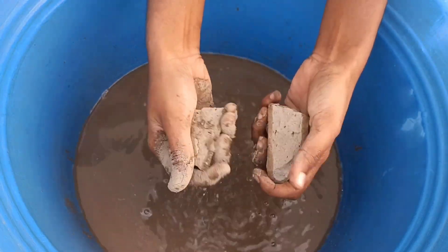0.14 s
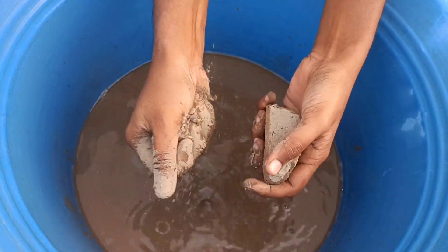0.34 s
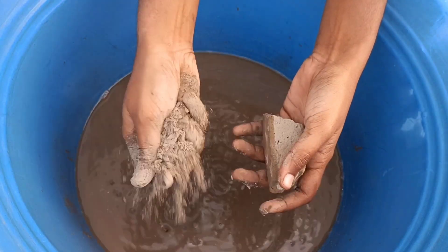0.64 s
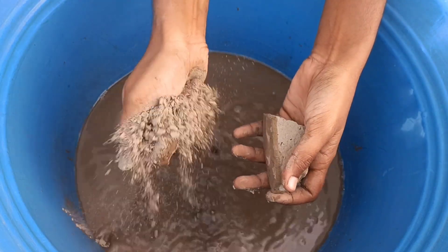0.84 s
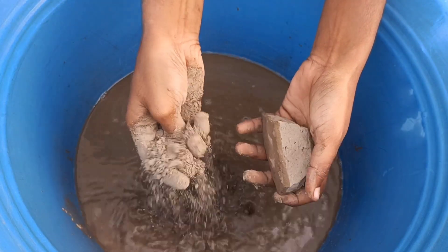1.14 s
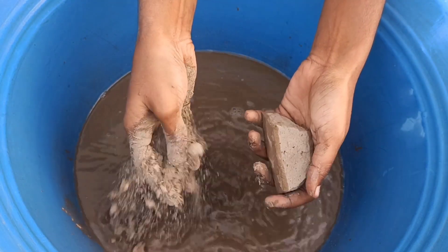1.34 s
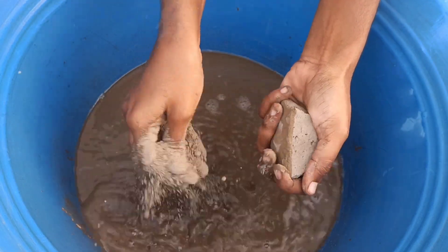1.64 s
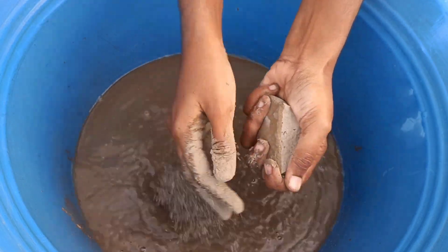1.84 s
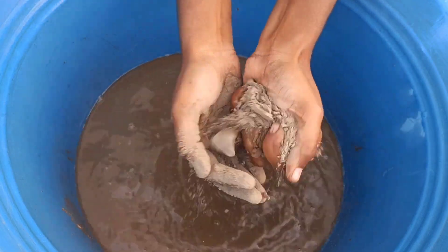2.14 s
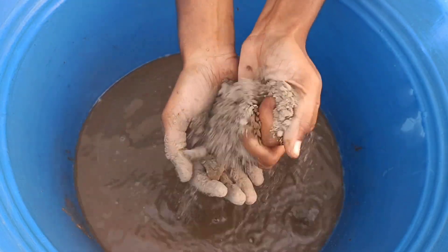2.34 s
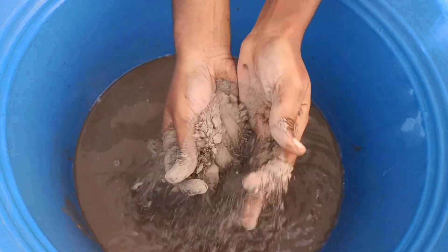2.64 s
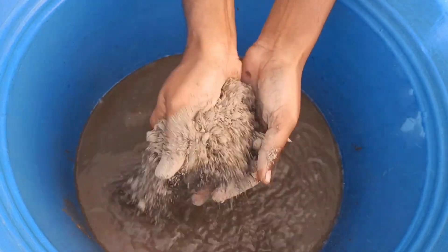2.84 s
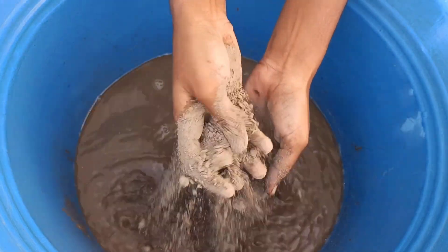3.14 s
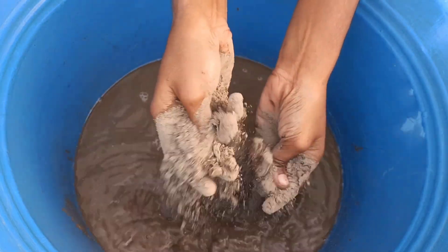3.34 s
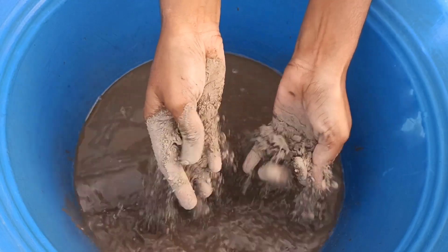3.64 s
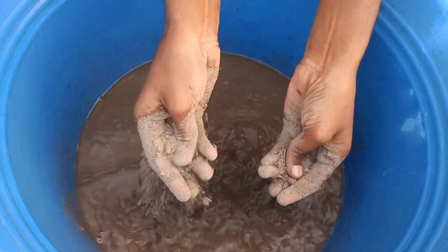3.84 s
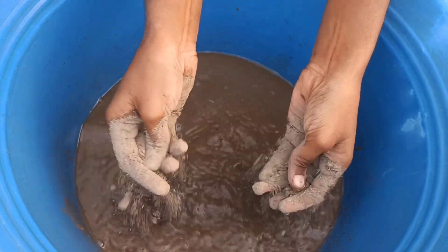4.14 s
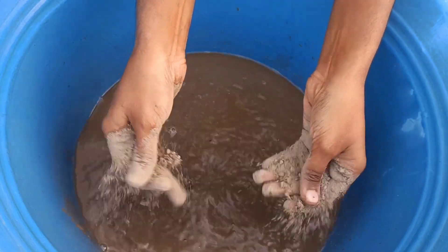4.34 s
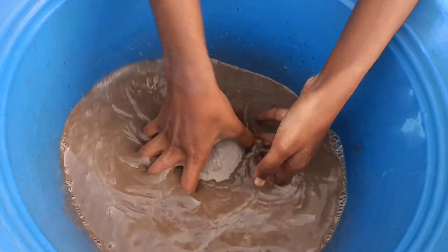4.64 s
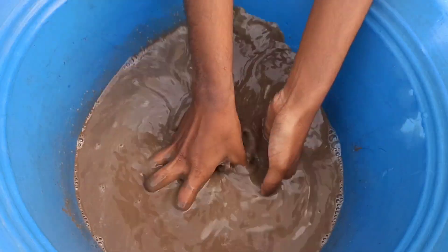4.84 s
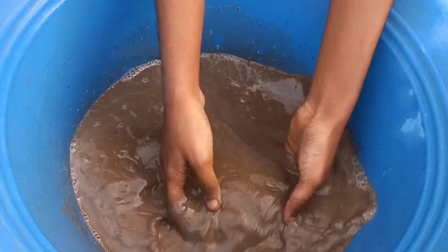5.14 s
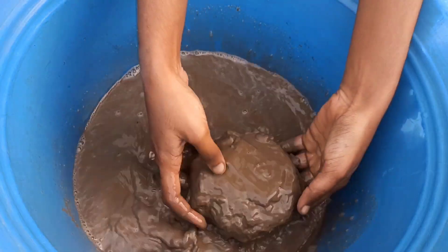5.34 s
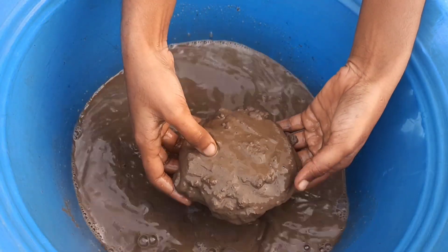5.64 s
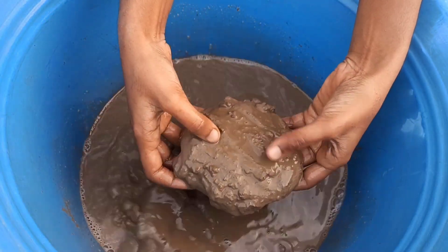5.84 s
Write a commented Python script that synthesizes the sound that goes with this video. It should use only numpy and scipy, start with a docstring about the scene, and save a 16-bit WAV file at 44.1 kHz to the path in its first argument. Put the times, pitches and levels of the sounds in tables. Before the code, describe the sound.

Close, wet plinks and bursts of gritty splashes as dirt falls into water, then hands churn bubbles and lift out a dripping lump.

```python
"""By a plastic tub of muddy water, hands crumble lumps of sandy dirt, then plunge in and lift out a soaked lump.
Each crumb is a tick of noise and the ringing of the small air pocket it opens in the water.
Clods plop as gliding tones, sand patters as swarms of tiny pockets, clumps splash as noise, and bubbles fizz.
The hands churn up a cloud of bubbles and drips run off the lump; the tub wall echoes these water sounds.
The rocking water rumbles, faint narrow tones linger, and far away a horn buzzes through its partials."""
import sys
import numpy as np
from scipy import signal
from scipy.fft import rfft, irfft
from scipy.io import wavfile
from scipy.ndimage import uniform_filter1d, minimum_filter1d

SR = 44100
rng = np.random.default_rng(int(sys.argv[2]) if len(sys.argv) > 2 else 0)


def int16_out(signal):
    """Quantize to a 16-bit WAV file."""
    q = np.round(np.clip(np.atleast_2d(signal).T, -1, 1) * 32767)
    wavfile.write(sys.argv[1], SR, q.astype(np.int16))


N = 264159
TIME = np.arange(N) / SR  # s


# "t60" below is always the time a sound takes to fade by 60 dB.
def undb(db):
    """Turn decibels into a gain."""
    return 10 ** (np.asarray(db) / 20)


def unit(x):
    """Scale a sound to an average (rms) strength of 1."""
    return x / np.sqrt(np.mean(x ** 2) + 1e-18)


def add(out, s, sound):
    """Mix a sound in, starting at s seconds."""
    i = int(np.clip(s * SR, 0, N - 1))
    out[i:i + len(sound)] += sound[:N - i]


def colour(x, points):
    """Shape the spectrum to (Hz, dB) points with a filter that never rings ahead of the sound."""
    size = 4096
    hz, db = np.transpose(points)
    bin_hz = np.arange(size // 2 + 1) * SR / size
    gain = undb(np.interp(np.log(bin_hz + 1), np.log(hz), db))
    # folding the cepstrum (the transform of the log gain) makes the filter minimum phase
    cepstrum = irfft(np.log(gain))
    cepstrum[1:size // 2] *= 2
    cepstrum[size // 2 + 1:] = 0
    response = irfft(np.exp(rfft(cepstrum)))
    return signal.fftconvolve(x, response)[:len(x)]


def fade(t, t60):
    """Die away exponentially, 60 dB down after t60."""
    return np.exp(-np.log(1000) * t / t60)


def surge(s, hold, rise, fall, db):
    """Gain over time of something that builds up, holds and dies away."""
    early = np.maximum(s - TIME, 0)
    late = np.maximum(TIME - s - hold, 0)
    return undb(db) * fade(early, rise) * fade(late, fall)


def together(gains):
    """Unrelated sounds add in power, not in amplitude."""
    return np.sqrt(sum(g ** 2 for g in gains))


def flicker(rate, depth_db):
    """A gain that heads for a new random level, rate times a second."""
    steps = rng.standard_normal(1000)
    return undb(depth_db * np.interp(TIME * rate, np.arange(len(steps)), steps))


def by_pitch(hz, seconds, slope):
    """Small, high pockets are quicker: a time given at 1 kHz, scaled by a power law."""
    return seconds * (hz / 1000) ** slope


def pocket(hz, t60, swell, glide):
    """An air pocket swells open, then its ring dies away; its pitch glides by so many octaves per t60."""
    t = np.arange(int((swell + t60) * SR) + 2) / SR
    phase = 2 * np.pi * np.cumsum(hz * 2 ** (glide * t / t60)) / SR
    opening = np.sin(np.pi / 2 * np.minimum(t / swell, 1))
    return np.sin(phase) * opening * fade(np.maximum(t - swell, 0), t60)


def swarm(rate, low_hz, high_hz, cycles, spread_db, glide, swell_cycles):
    """Many small pockets, rate per second at random moments, most weak and a few strong."""
    out = np.zeros(N)
    for when, pitch, size, ring, bend in rng.random((int(rate * N / SR), 5)):
        hz = min(low_hz * (high_hz / low_hz) ** pitch, SR / 3)
        strength = undb(-spread_db * np.log(size + 0.004)) * np.sqrt(hz)
        t60 = cycles * (.5 + ring) / hz
        add(out, when * N / SR, strength * pocket(hz, t60, swell_cycles / hz, glide * 2 * bend))
    return unit(out)


# Sound of the pattering grains, of the fine grit and of the spray, as relative spectra: f/Hz, level/dB
PATTER_SPECTRUM = [(250, -16), (420, -5), (650, -3.5), (850, -12), (1200, 2.5), (2000, -1), (3000, 0),
                   (4200, -5.5), (5200, -23), (8000, -31)]
GRIT_SPECTRUM = [(3500, -39), (5100, -9.5), (6500, 6), (7700, -12), (9000, 2.5), (10000, -23.5),
                 (16000, -27)]
SPRAY_SPECTRUM = [(6000, -29.5), (9500, 2.5), (11500, -2.5), (14000, 6), (16000, -6.5)]
# Falls of sand or water, also used by fizz() and heave(); levels are before each layer's own trim.
# t/s, hold/s, rise/s and fall/s (both for 60 dB), then
# patter level/dB, fine grit level/dB, spray level/dB, fizz level/dB, rocking level/dB
SAND_FALLS = [(0.0, 0.0059, .1, 0.1, -78, -53.5, -85, -75, -35.5),
              (0.58, 0.047, 0.12, 1.2, -73, -65, -90, -73.5, -43.5),
              (0.93, .04, 0.35, 0.23, -69.5, -77, -92, -65.5, -64),
              (1.087, 0.087, 0.11, 0.42, -63.5, -68, -80, -61, -49.5),
              (1.34, 0.05, 0.32, 0.23, -41, -51.5, -67, -52.5, -35.5),
              (1.626, 0.16, 0.31, 0.15, -42.5, -58.5, -61, -62, -45),
              (1.862, 0.026, 0.59, 1.2, -52, -73, -87, -60, -52.5),
              (2.152, .12, 0.21, 0.22, -54.5, -69.5, -88, -74, -50),
              (2.936, .09, 0.07, 0.39, -52, -62.5, -60.5, -54.5, -39),
              (3.409, .02, 0.14, 0.22, -51, -57.5, -80, -51.5, -44),
              (3.693, .19, 0.54, 0.88, -32, -48, -53.5, -54.5, -39),
              (4.05, .03, 0.31, 0.28, -39, -63, -76, -57, -43),
              (4.466, 0.014, 0.55, 1, -52, -63.5, -78, -70, -30.5),
              (4.799, .02, 0.18, .6, -48, -69.5, -84, -75, -53.5),
              (4.953, 0.011, 0.18, 0.71, -28.5, -59, -71.5, -45, -24),
              (5.439, .05, 0.34, 0.36, -25.5, -46, -59.5, -33, -29),
              (5.65, .05, 0.4, 1.1, -53, -67, -68.5, -57.5, -52),
              (5.856, 0.16, 0.35, .5, -55, -52, -67, -48.5, -46)]


def sand(shower_db=-44, small_crumbs_db=-3):
    """Single grains plink on the water and merge into a wash as more fall; fine grit and spray hiss above them."""
    flow = together(surge(s, hold, rise, fall, db) for s, hold, rise, fall, db, *_ in SAND_FALLS)
    flow = flow * flicker(rate=60, depth_db=2)
    dust = together(surge(s, hold, rise, fall, db) for s, hold, rise, fall, _, db, *_ in SAND_FALLS)
    spray = together(surge(s, hold, rise, fall, db) for s, hold, rise, fall, _, _, db, *_ in SAND_FALLS)

    single = swarm(rate=81, low_hz=1660, high_hz=4800, cycles=23, spread_db=9.0, glide=.1, swell_cycles=3.8)
    shower = swarm(rate=1600, low_hz=413, high_hz=4800, cycles=29, spread_db=2.5, glide=.1, swell_cycles=1.0)
    small_crumbs = swarm(rate=64, low_hz=1350, high_hz=3250, cycles=38, spread_db=5.5, glide=.05,
                         swell_cycles=1.1)
    single = unit(colour(single + rng.standard_normal(N), PATTER_SPECTRUM))
    shower = unit(colour(shower + undb(-10) * rng.standard_normal(N), PATTER_SPECTRUM))
    merged = flow / (flow + undb(shower_db))  # 0: single grains, 1: all wash
    grains = np.sqrt(1 - merged) * single + np.sqrt(merged) * shower
    patter = flow * (grains + undb(small_crumbs_db) * small_crumbs)

    grit = swarm(rate=500, low_hz=4180, high_hz=14600, cycles=4.9, spread_db=1.5, glide=0, swell_cycles=1.0)
    grit = grit + undb(-1) * rng.standard_normal(N)
    fine = dust * unit(colour(grit, GRIT_SPECTRUM)) + spray * unit(colour(grit, SPRAY_SPECTRUM))
    fine = fine * flicker(rate=57, depth_db=4.5)
    return undb(-2.0) * patter + undb(-2.0) * fine


# Clumps of sand slapping the water and bursting into spray:
# t/s, level/dB (before fading), t60/s, treble tilt/(dB per octave)
SAND_SPLATS = [(0.0, -41.5, 0.08, -5), (0.565, -48.5, 0.15, -3), (1.327, -27, 0.043, -0.5),
               (1.347, -43.5, 0.11, -1.5), (1.364, -20.5, 0.026, 2), (1.399, -40.5, 0.15, -1),
               (1.431, -35.5, 0.11, -2), (1.645, -23.5, 0.032, -3), (1.657, -19.5, 0.068, -3.5),
               (1.696, -12, 0.036, -2.5), (1.7075, -13.5, 0.019, 2.5), (1.744, -7, 0.015, -3.5),
               (2.137, -38.5, 0.15, -2), (2.953, -35, 0.049, -0.5), (3.002, -52, 0.11, 14),
               (3.033, -44.5, 0.078, 1.5), (3.772, -24.5, 0.077, -2), (3.871, -24, 0.032, 0.5),
               (4.471, -53, 0.19, -2), (4.581, -44, 0.5, -8.5), (4.815, -53.5, 0.095, 13),
               (4.965, -38, 0.11, 5), (5.466, -22.5, 0.043, -4)]


def splats(grain_db=3):
    """Many grains land at once: a ragged burst of noise over a wide range that dies quickly."""
    out = np.zeros(N)
    t = np.arange(SR // 4) / SR
    band_hz = np.array([120, 300, 600, 2000, 4200, 5200, 6600, 9000, 11000, 15000])
    band_db = np.array([-14.5, -5.5, 6, 8.5, 3, -8.0, 1, -3.0, -10.5, -13.0])
    for s, db, t60, tilt_db in SAND_SPLATS:
        noise, clumps = rng.standard_normal((2, len(t)))
        grains = noise * undb(grain_db * unit(uniform_filter1d(clumps, size=40)))
        tilted_db = band_db + tilt_db * np.log2(band_hz / 2000)
        burst = colour(grains, np.column_stack([band_hz, tilted_db]))
        add(out, s, undb(db) * unit(burst) * fade(t, t60))
    return out


# The fizz trails each fall
FIZZ_LAG_S, FIZZ_RISE_S, FIZZ_T60_S = 0.0061, 0.14, 0.43
# Sound of the bursting bubbles, as a relative spectrum: f/Hz, level/dB
FIZZ_SPECTRUM = [(1000, -21.5), (1800, -4), (2600, -10.5), (3500, -1), (4200, -4.5), (4700, -1.5),
                 (5300, -23.5), (9000, -37.5)]


def fizz(wash_db=-4, stirred_db=-30, stirred_share=0.91):
    """After each fall and under the hands, tiny bubbles leave the soaking grains and burst in a soft crackle."""
    tiny = swarm(rate=450, low_hz=1800, high_hz=4800, cycles=28, spread_db=4.0, glide=.1, swell_cycles=2.3)
    crackle = unit(colour(tiny + undb(wash_db) * rng.standard_normal(N), FIZZ_SPECTRUM))
    soaking = [surge(s + FIZZ_LAG_S, hold, FIZZ_RISE_S, FIZZ_T60_S, db)
               for s, hold, *_, db, _ in SAND_FALLS]
    stirred = undb(stirred_db) * stirring() ** stirred_share
    return crackle * together(soaking + [stirred])


# Rocking at the usual level has this t60; it settles twice as fast for each step of ROCK_SHORTEN_DB
ROCK_RISE_S, ROCK_T60_S, ROCK_USUAL_DB, ROCK_SHORTEN_DB = 0.12, 0.96, -43.5, 17
# Sound of the rumbling wall, as a relative spectrum: f/Hz, level/dB
HEAVE_SPECTRUM = [(20, -20), (45, -7), (90, 1), (125, 4.5), (165, -10), (215, -2), (320, -2), (420, -18),
                  (800, -29.5), (2000, -43.5)]


def heave(stirred_db=-24, idle_db=-59):
    """Each fall and stroke rocks the water, which makes the plastic wall rumble; big falls settle fastest."""
    rocking = []
    for s, hold, *_, db in SAND_FALLS:
        t60 = ROCK_T60_S / 2 ** ((db - ROCK_USUAL_DB) / ROCK_SHORTEN_DB)
        rocking.append(surge(s, hold, ROCK_RISE_S, t60, db))
    level = together(rocking + [undb(stirred_db) * stirring(), undb(idle_db)])
    rumble = unit(colour(rng.standard_normal(N), HEAVE_SPECTRUM))
    return undb(-7.0) * rumble * level


# Faint narrow tones between the splashes: t/s, length/s, f/Hz, width f/Hz, level/dB (before fading), t60/s
LINGERING_TONES = [(0.0, 0.56, 435, 6.7, -51, 0.65), (0.0, 0.29, 224, 5.2, -50, 0.77),
                   (2.143, .18, 313.4, 23, -50, 2.2), (2.203, 0.5, 2050, 164, -60.5, 0.95),
                   (2.532, 0.45, 645, 37, -68, 33.4), (2.935, .26, 628, 30, -57, 30),
                   (3.287, 0.43, 640, 22, -64, 31), (3.01, .21, 1023, 28, -54, 2.8),
                   (5.2, .22, 3880, 30, -46.5, 2.4)]


def tones():
    """Slow random noise shifted up to one pitch gives narrow wavering tones that come in softly and fade."""
    out = np.zeros(N)
    for start, length, hz, width_hz, db, t60 in LINGERING_TONES:
        narrow = signal.butter(2, width_hz, fs=SR, output="sos")
        t = np.arange(int(length * SR)) / SR
        noise = rng.standard_normal(2 * SR) + 1j * rng.standard_normal(2 * SR)
        waver = signal.sosfilt(narrow, noise)[-len(t):]
        tone = unit(np.real(waver * np.exp(2j * np.pi * hz * t)))
        add(out, start, undb(db) * tone * fade(t, t60) * signal.windows.tukey(len(t), .15))
    return out


# Sound of the quiet background, as a relative spectrum: f/Hz, level/dB
BACKGROUND_SPECTRUM = [(30, -10), (120, -0.5), (300, -14.5), (500, -19.5), (1500, -20), (4000, -30),
                       (15000, -32)]


def background():
    """Quiet steady noise, strongest in the bass."""
    return undb(-69.0) * unit(colour(rng.standard_normal(N), BACKGROUND_SPECTRUM))


# Ring time of a 1 kHz pocket, and its power law over pitch
CRUMB_T60_S, CRUMB_T60_SLOPE = 0.039, -0.67
# The loudest crumbs and drops striking the water, levels relative:
# t/s, starting f/Hz of the air pocket, ring level/dB, tick level/dB
LOUD_CRUMBS = [(0.5621, 1806, -31, -51), (0.828, 2390, -36.5, -75), (0.947, 2260, -47, -73),
               (1.112, 2370, -30, -56), (1.1685, 2180, -34, -42), (1.2438, 2250, -35.5, -66),
               (1.2748, 2270, -28, -28.5), (1.289, 3130, -26.5, -43), (1.3272, 1404, -12, -27),
               (1.3475, 1890, -21, -40), (1.364, 3000, -36, -20.5), (1.3968, 2640, -26.5, -33),
               (1.4028, 2230, -20.5, -38), (1.439, 1920, -20, -31), (1.592, 6000, -36.5, -31.5),
               (1.632, 1025, -19.5, -22), (1.6578, 1340, -12.5, -29), (1.6976, 1052, -7, -23),
               (1.7455, 1102, -8.5, -17), (1.765, 1360, -11.5, -20), (1.899, 1780, -38, -63),
               (2.019, 1750, -37.5, -70), (2.0911, 1735, -37.5, -60), (2.239, 3150, -46.5, -57),
               (2.914, 2473, -36, -58), (2.9315, 3290, -25.5, -51), (2.9502, 2380, -22, -50),
               (2.9838, 1900, -23.5, -45), (3.019, 3350, -26, -32), (3.0345, 2160, -32.5, -36),
               (3.0934, 2004, -37.5, -67.5), (3.3713, 2420, -32, -67), (3.406, 2350, -28.5, -49),
               (3.423, 1980, -35, -34), (3.5833, 1820, -29, -37), (3.631, 1347, -22, -45),
               (3.6504, 1074, -22, -27.5), (3.714, 1114, -13, -22.5), (3.7266, 1830, -16.5, -36),
               (3.7458, 1405, -14.5, -27), (3.7754, 2530, -16, -34), (3.8396, 2500, -23, -23.5),
               (3.8619, 1860, -10.5, -24), (3.8739, 1032, -15, -22), (3.9182, 1950, -16.5, -45),
               (3.948, 1480, -22.5, -31), (4.0522, 1830, -17, -34), (4.0666, 1548, -16, -27.5),
               (4.0799, 1404, -16.5, -44), (4.3573, 1860, -37.5, -68), (4.4263, 2700, -31, -62),
               (4.5813, 970, -30.5, -74), (4.5963, 1300, -28.5, -63), (4.8046, 1870, -33, -78),
               (4.9245, 2000, -18.5, -31), (4.9317, 1870, -16.5, -42), (4.9607, 1864, -12, -20.5),
               (4.9678, 1117, -5, -30), (5.121, 1420, -4.5, -30), (5.438, 2000, -16.5, -46),
               (5.4628, 900, -15, -9), (5.4688, 1895, -6.5, -35), (5.4868, 990, -8.5, -20.5),
               (5.5412, 1940, -13.5, -19.5), (5.7107, 4100, -36.5, -41), (5.831, 4000, -24.5, -51),
               (5.8541, 2680, -19, -29), (5.9082, 1430, -22.5, -17.5), (5.9178, 1880, -17.5, -25)]


def crumbs(sag=-0.028, splash_db=-6, splash_t60=0.028, tick_db=-3, tick_t60=0.011,
           slap_db=-2, body=0.82, bright=2.53, swell_cycles=0.44):
    """A hard tick and a slap at contact, the ring of the pocket, and a brief splash around its pitch."""
    rings, ticks = np.zeros(N), np.zeros(N)
    t = np.arange(SR // 12) / SR
    for s, hz, db, hit_db in LOUD_CRUMBS:
        splash_noise, tick_noise = rng.standard_normal((2, len(t)))
        band = signal.butter(1, [hz * 1.032, min(hz * 1.18, SR / 3)], "band", fs=SR, output="sos")
        plip = undb(splash_db) * unit(signal.sosfilt(band, splash_noise)) * fade(t, splash_t60)
        ring_t60 = by_pitch(hz, CRUMB_T60_S, CRUMB_T60_SLOPE)
        add(plip, 0, pocket(hz, ring_t60, swell_cycles / hz, sag))
        slap = pocket(hz * 1.3, 0.0032, .0001, -0.25)
        add(plip, 0, undb(slap_db) * slap)
        # a small pocket radiates little far from its own pitch
        reach_hz = [hz * min(body, .9), min(hz * max(bright, 1.3), SR / 3)]
        reach = signal.butter(3, reach_hz, "band", fs=SR, output="sos")
        add(rings, s - .0003, undb(db) * signal.sosfilt(reach, plip))
        onset = np.minimum(t / 0.00028, 1)
        add(ticks, s, undb(hit_db + tick_db) * tick_noise * fade(t, tick_t60) * onset)
    tick_spectrum = [(300, -11), (1500, 0.5), (4200, 13.0), (5200, -1.5), (6600, 7.5),
                     (8500, -11.5), (10500, -14.0), (15000, -17)]
    return rings + colour(ticks, tick_spectrum)


# Time a 1 kHz pocket takes to open, and its power law over pitch
SWELL_S, SWELL_SLOPE = 0.0033, -0.68
# Clods, gulps, bubbles and small high crumb plinks:
# t/s, starting f/Hz, level/dB (before roughening), t60/s, glide/(octaves per t60)
PLOPS_AND_PLINKS = [(1.552, 1138, -33.5, 0.13, -0.5), (1.633, 493, -21.5, 0.022, -0.45),
                    (1.64, 470, -17, 0.029, -.2), (1.659, 550, -22, 0.055, -0.1),
                    (1.706, 477, -12, 0.027, 0.064), (1.707, 6500, -8, .007, -.14),
                    (1.715, 377, -21, 0.15, -0.39), (1.729, 331, -23, 0.13, -0.37),
                    (1.746, 483, -23, 0.1, -0.7), (1.823, 1880, -36, 0.028, -0.3),
                    (2.137, 326, -36, 0.21, -0.073), (2.142, 660, -31, 0.079, 0.01),
                    (2.566, 4020, -53, .018, 0.077), (2.671, 1086, -39.5, 0.08, -0.21),
                    (3.125, 3920, -50, .012, .1), (3.209, 3800, -44, 0.014, 0.39),
                    (3.279, 3700, -46, 0.015, 0.29), (3.651, 1124, -16.5, .028, -0.057),
                    (3.715, 1113, -13, 0.03, -0.32), (3.774, 659, -25, .065, 0.099),
                    (3.873, 638, -23, .071, -0.089), (3.876, 412, -23, 0.028, -0.58),
                    (4.193, 2250, -37, 0.03, 0.15), (4.233, 1072, -40, 0.068, -0.14),
                    (4.406, 338, -33.5, 0.22, 0.14), (4.470, 1080, -10.5, 0.031, -0.38),
                    (4.473, 501, -22.5, 0.083, -.7), (4.950, 690, 1, 0.0069, -.1),
                    (4.969, 493, -14.5, 0.081, -0.85), (4.978, 356, -2.5, 0.036, -0.24),
                    (4.992, 141.4, -21.5, 0.1, -.34), (5.023, 1865, -9, 0.012, 0.068),
                    (5.032, 3200, -15.5, 0.026, 0.075), (5.040, 1610, -6, .014, .05),
                    (5.059, 2370, -16.5, 0.035, 0.32), (5.119, 697, -13, 0.082, -0.48),
                    (5.178, 765, -13.5, 0.025, 0.11), (5.095, 339.7, -22.5, 0.28, -0.26),
                    (5.322, 657, -23, 0.097, 0), (5.448, 319, -25, 0.19, -0.058),
                    (5.445, 613, -12, 0.033, 0.2), (5.456, 718, -7.5, 0.035, -0.27),
                    (5.474, 710, -12, 0.039, -0.34), (5.486, 970, -0.5, 0.02, 0.15),
                    (5.49, 1610, -13, 0.061, 0.69), (5.502, 4700, -15.5, 0.011, 0.025),
                    (5.523, 1390, -11.5, 0.084, -.24), (5.528, 647, -6, 0.08, -0.25),
                    (5.573, 810, -16.5, 0.054, 0.58), (5.813, 2860, -20.5, 0.025, -0.15),
                    (5.840, 4990, -22, .014, -0.72), (5.888, 2010, -20.5, 0.067, -0.28),
                    (5.918, 1222, -20.5, 0.032, -0.21)]


def plops_and_plinks(froth_db=-12, froth_width=0.44):
    """Air pockets, large and small, swell over a few cycles; their ragged walls roughen the note."""
    out = np.zeros(N)
    for s, hz, db, t60, glide in PLOPS_AND_PLINKS:
        note = pocket(hz, t60, by_pitch(hz, SWELL_S, SWELL_SLOPE), glide)
        wall = signal.butter(3, min(hz * froth_width, SR / 4), fs=SR, output="sos")
        ragged = unit(signal.sosfilt(wall, rng.standard_normal(SR // 2)))[:len(note)]
        add(out, s, undb(db) * note * (1 + undb(froth_db) * ragged))
    return out


HORN_HZ = 550  # average pitch
# Loudness of a far-off vehicle horn over time, shared by its partials: t/s, level/dB
HORN_LOUDNESS = [(3.9, -90), (3.97, -55), (4.12, -53), (4.24, -56), (4.30, -65), (4.34, -90)]
# Its partials: multiple of the horn's pitch, level/dB (before fluttering)
HORN_OVERTONES = [(1, -24.5), (2, 3.5), (3, -5), (4, -15), (5, 1), (6, -8), (7, -9), (8, -24)]


def horn(waver=0.0041, flutter_db=3):
    """A buzz of slightly wavering pitch whose partials flutter on their way through the air."""
    drift = [unit(signal.resample(rng.standard_normal(200), N)) for _ in range(len(HORN_OVERTONES) + 1)]
    phase = 2 * np.pi * np.cumsum(HORN_HZ * (1 + waver * drift[-1])) / SR
    buzz = np.zeros(N)
    for (multiple, db), slow in zip(HORN_OVERTONES, drift):
        buzz += undb(db + flutter_db * slow) * np.sin(round(multiple) * phase)
    loudness = undb(np.interp(TIME, *np.transpose(HORN_LOUDNESS)))
    sounding = (TIME > HORN_LOUDNESS[0][0]) * (TIME < HORN_LOUDNESS[-1][0])
    return buzz * loudness * sounding


# Strokes of the hands under water: t/s, hold/s, rise/s and fall/s (both for 60 dB), relative level/dB
HAND_STROKES = [(5.015, 0.034, .06, 0.48, -19), (5.105, 0.026, .22, 0.57, -13.5),
                (5.20, 0.0295, .2, 0.54, -17), (5.294, 0.018, .2, .5, -23),
                (5.462, 0.021, 0.196, 0.139, -19.5)]


def stirring():
    """How hard the hands push the water: all the strokes added in power."""
    return together(surge(*stroke) for stroke in HAND_STROKES)


# Centre of the bubble cloud at the hardest push; it sinks as the hands slow
CHURN_HZ, CHURN_OCT_PER_DB = 1341, 0.05
# Sound of the stirred bubbles, as a relative spectrum: f/Hz, level/dB
CHURN_SPECTRUM = [(150, -37), (300, -13.5), (460, -16), (680, -5), (900, -7), (1300, 1.5), (1900, -5),
                  (2500, -16), (4000, -31), (5200, -30.5), (9000, -33)]


def churn(focus_db=-1, focus_width_hz=170, gurgle_db=-4):
    """Bubbles stirred up by the hands and escaping from the soaking lump ring most around one moving pitch."""
    cloud = swarm(rate=2200, low_hz=277.5, high_hz=5480, cycles=30, spread_db=0.5, glide=0.1, swell_cycles=1.2)
    cloud = unit(colour(cloud, CHURN_SPECTRUM))
    gurgle = swarm(rate=150, low_hz=584, high_hz=2050, cycles=53, spread_db=3.5, glide=0.26, swell_cycles=3.8)
    effort = stirring()
    effort_db = 20 * np.log10(effort / effort.max() + 1e-3)
    centre_hz = CHURN_HZ * 2 ** (CHURN_OCT_PER_DB * effort_db)
    phase = 2 * np.pi * np.cumsum(centre_hz) / SR
    # about 700 bubbles a second set off a narrow ringing, which is then shifted up to the moving pitch
    born = rng.random(N) < 700 / SR
    births = rng.standard_normal(N) * born * np.exp(2j * np.pi * rng.random(N))
    ringing = signal.sosfilt(signal.butter(2, focus_width_hz, fs=SR, output="sos"), births)
    focus = unit(np.real(ringing * np.exp(1j * phase)))
    mix = unit(cloud + undb(focus_db) * focus + undb(gurgle_db) * gurgle)
    return undb(-1.5) * mix * effort


def tub(x, early_db=-12, early_t60=0.11, room_db=-23, room_t60=0.14):
    """Quick reflections off the tub wall and a faint room beyond, made of fading noise with less high treble."""
    t = np.arange(SR) / SR
    near, far = rng.standard_normal((2, SR))
    early = unit(near * fade(t, early_t60) * (t > .002)) / np.sqrt(SR)
    room = unit(far * fade(t, room_t60) * (t > .01)) / np.sqrt(SR)
    wall_spectrum = [(100, 6.5), (320, 0.5), (800, 0.5), (2000, 1.5), (4000, 0), (5500, 0.0), (15000, -9.5)]
    echoes = colour(undb(early_db) * early + undb(room_db) * room, wall_spectrum)
    return signal.fftconvolve(x, echoes)[:N]


def scene():
    """The water sounds and their echoes in the tub, with the rumble, tones, horn and quiet background."""
    water = sand() + splats() + fizz() + crumbs() + plops_and_plinks() + churn()
    return (water + tub(water) + heave() + tones() + background() + horn())[None]


def record(dry, ceiling_db=-3, top_hz=15250):
    """A fast limiter holds the loudest peaks; the deepest bass and the top are cut."""
    gain = np.minimum(1, undb(ceiling_db) / (np.abs(dry) + 1e-9))
    # spread each dip in gain over about 3 ms, then smooth it
    held = dry * uniform_filter1d(minimum_filter1d(gain, size=130), size=130)
    held = signal.sosfilt(signal.butter(2, 42, "high", fs=SR, output="sos"), held)
    return signal.sosfilt(signal.ellip(8, .2, 70, top_hz, fs=SR, output="sos"), held)


dry = scene()
out = record(dry)
int16_out(out)
```